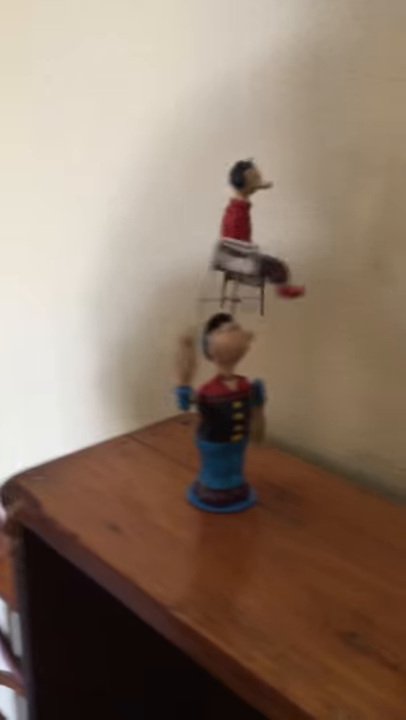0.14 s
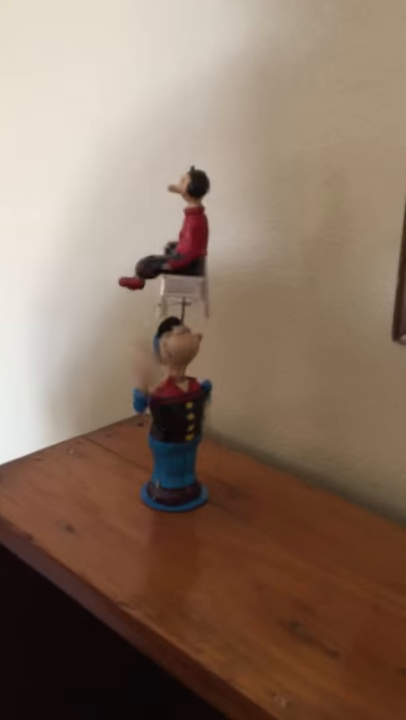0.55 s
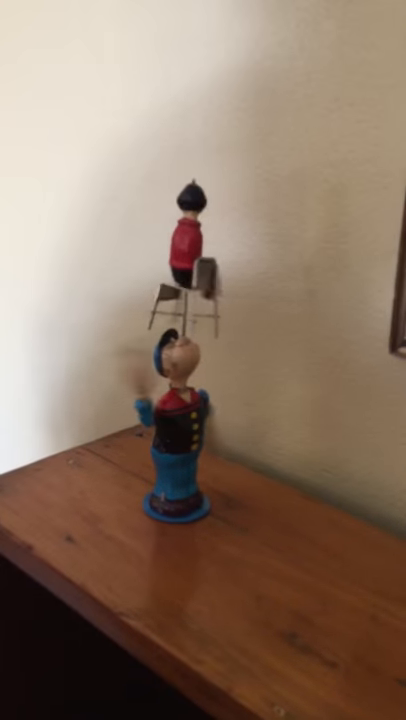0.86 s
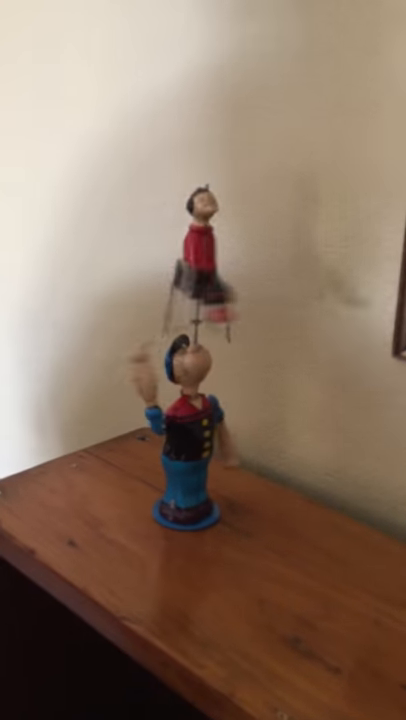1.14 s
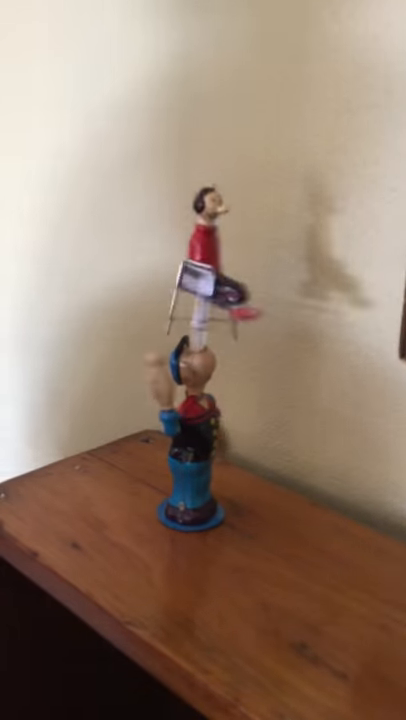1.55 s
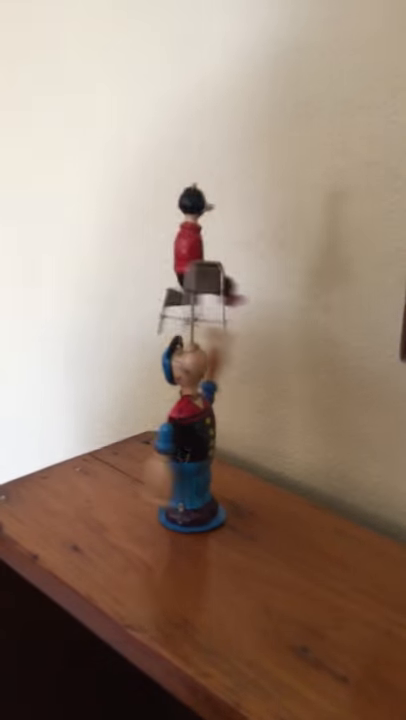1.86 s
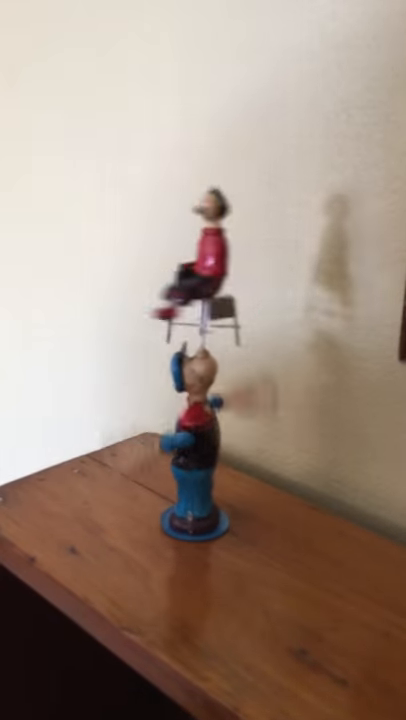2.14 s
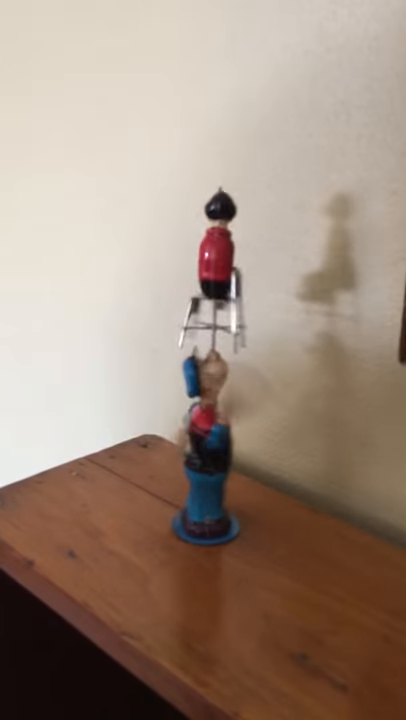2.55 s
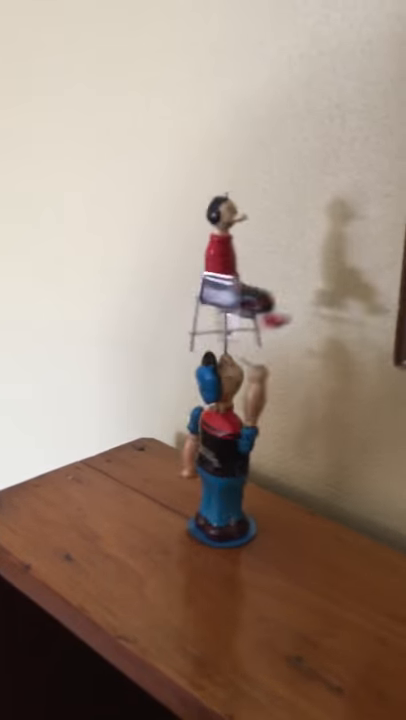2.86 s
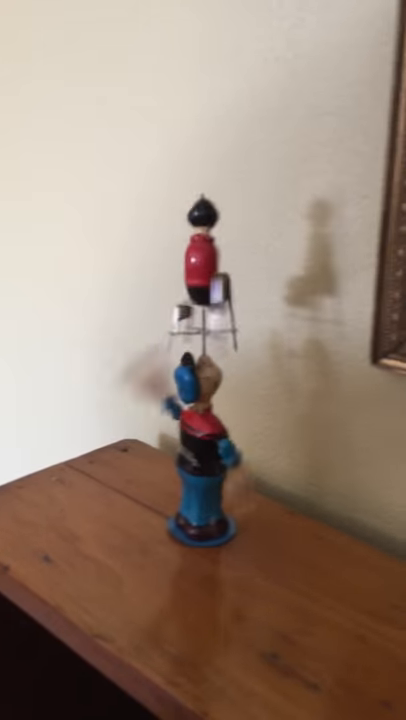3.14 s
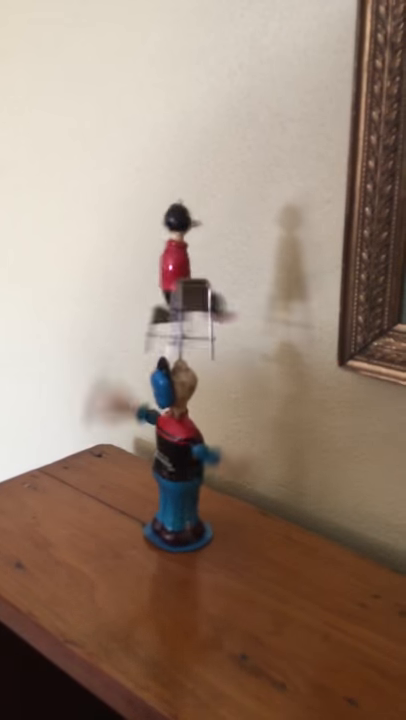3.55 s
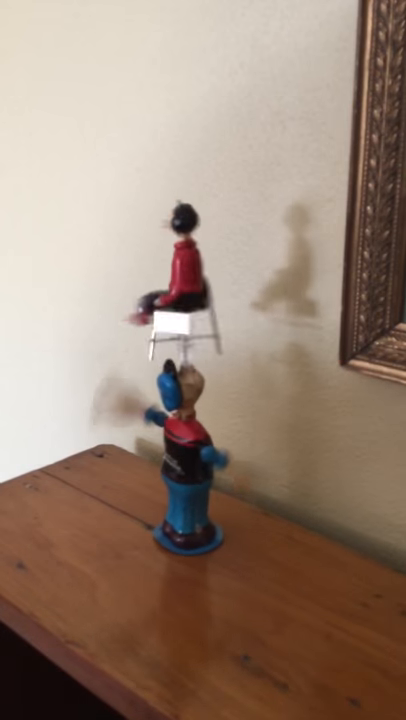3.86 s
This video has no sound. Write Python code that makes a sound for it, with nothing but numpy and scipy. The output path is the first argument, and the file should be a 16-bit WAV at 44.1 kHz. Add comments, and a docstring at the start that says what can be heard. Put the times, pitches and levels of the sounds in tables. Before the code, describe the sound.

A tin wind-up toy clacks and rattles as it runs on a wooden cabinet top indoors.

```python
"""On a wooden cabinet top in a small room, a tin wind-up toy runs close to the microphone.
Arms and chair clack about twice a second, loose joints tick and pivots scrape: noise bursts through tin
resonances. Decaying sines ring the hollow body; filtered knocks and noise rumble in the wood.
Low tones boom briefly, one dull thump falls near the middle, and faint air noise lies beneath.
Early echoes and a room tail shift as the toy turns."""
import sys
import numpy as np
from scipy import signal
from scipy.fft import rfft, irfft
from scipy.io import wavfile
from scipy.ndimage import uniform_filter1d

SR = 44100
rng = np.random.default_rng(int(sys.argv[2]) if len(sys.argv) > 2 else 0)


def transcribe(signal):
    """Save signal, clipped to [-1, 1], as a 16-bit WAV file at the path in sys.argv[1]."""
    frames = np.atleast_2d(signal).T
    limited = np.clip(frames, -1, 1)
    pcm = np.round(limited * 32767).astype(np.int16)
    wavfile.write(sys.argv[1], SR, pcm)


N = 176400
T = np.arange(N) / SR

# All dB in the tables are relative; filters and the mix scale them further.
# Clacks. Each row: start in seconds, crack in dB, chatter in dB, chatter decay in seconds, shelf on the
# middle and low tones in dB, struck-part ring in Hz, ring in dB, push on the wood in dB.
CLACK_EVENTS = [(0.206, -16, -27.5, 0.0082, -11.5, 3150, 4, -42),
                (0.665, -25, -28.5, 0.0055, -1.5, 3470, 8.5, -43.5),
                (1.1848, -18, -27, 0.015, 2.5, 3300, -7, -39),
                (1.5832, -20.5, -28, .011, -0.5, 3450, 0.5, -42),
                (2.5537, -37, -34, 0.003, 3, 4440, -1, -55),
                (2.6514, -20.5, -36, 0.0052, 1, 2080, -1, -45.5),
                (2.9180, -12.5, -29, 0.016, -1.5, 2480, -7, -37),
                (3.3645, -16.5, -27.5, .013, -2.5, 2880, -6, -37.5)]
# Taps of loose joints. Each row: start in seconds, level in dB, shelf on the middle and low tones in dB.
TICK_EVENTS = [(0.082, -57, -4), (.149, -54, 6), (0.2242, -29.5, -2), (0.2993, -46, -13),
               (0.4437, -49, -10), (.578, -57.5, 0), (.595, -57, -7), (.853, -64.5, -14), (1.0256, -55, 6),
               (1.0397, -42.5, 2), (1.0598, -40, -13), (1.1215, -45.5, 3.5), (1.332, -51, -1),
               (1.3466, -51, 9.5), (1.3817, -54, 11), (1.4536, -67, 9), (1.7131, -47, -12),
               (1.727, -52.5, 7), (2.0669, -44.5, -1), (2.094, -46, -7), (2.1005, -45.5, 9.5),
               (2.27, -50, 11), (2.2798, -40, 6), (2.287, -46.5, 13), (2.3132, -40, -7), (2.3415, -43, -5),
               (2.392, -50, 0), (2.4141, -42, 5.5), (2.386, -53.5, 5), (2.501, -46.5, 11),
               (2.545, -43.5, -9), (2.6238, -40.5, 0), (2.7257, -45, 6.5), (2.7595, -48.5, -15),
               (2.7858, -50.5, 4), (2.8022, -47, 5), (2.822, -51.5, 9), (3.2875, -45.5, 0.5),
               (3.394, -36.5, 3.5), (3.468, -47, 3), (3.479, -55, 4), (3.489, -57, -4), (3.5318, -46, -10),
               (3.546, -40, -1), (3.6226, -50.5, -8), (3.6465, -47, 0), (3.660, -49.5, 4), (3.761, -44, -6),
               (3.7683, -38, -14), (3.777, -39.5, -1), (3.786, -40, -4), (3.8153, -46, 6),
               (3.831, -54.5, 9), (3.889, -61.5, 6), (3.909, -60.5, 9), (3.9597, -54, -20)]
# Tin rubbing on tin. Each row: start in seconds, length in seconds, level in dB, squeak in Hz.
SCRAPE_EVENTS = [(0.076, 0.044, -61.5, 1800), (0.138, 0.087, -60.5, 1900), (0.514, 0.018, -72.5, 1760),
                 (0.572, 0.045, -62.5, 1800), (0.634, 0.059, -59.5, 2200), (0.909, .045, -63.5, 1780),
                 (0.955, 0.15, -70.5, 1770), (1.023, 0.055, -55.5, 1790), (1.15, 0.064, -51.5, 1740),
                 (1.429, .05, -62.5, 1120), (1.566, .03, -52.5, 1990), (1.848, 0.026, -67, 1820),
                 (2.273, 0.064, -53.5, 1530), (2.382, 0.035, -52.5, 1820), (2.493, .06, -59, 1550),
                 (2.62, 0.085, -54, 2140), (2.729, 0.14, -64, 2580), (2.883, .06, -54.5, 2040),
                 (3.344, 0.027, -53.5, 2700), (3.434, 0.057, -60, 1790), (3.56, 0.11, -68, 1480),
                 (3.702, 0.13, -60.5, 2530), (3.876, 0.069, -71.5, 1760)]
# Low notes of the wooden top. Each row: start in seconds, length in seconds, level in dB, pitch in Hz.
BOOM_EVENTS = [(1.195, 0.052, -38, 161.2), (1.232, .075, -35, 151.3), (1.865, 0.033, -43, 190),
               (2.39, 0.033, -37, 171), (2.975, 0.048, -42, 154), (3.41, 0.065, -42, 152.7)]
# Partials of the dull thump. Each row: frequency in Hz, level in dB, T60 in seconds.
THUMP_PARTIALS = [(132, -32, 0.14), (205.4, -40.5, 0.15), (251.7, -35.5, 0.22), (385, -59, 0.12),
                  (518, -58, 0.093)]
# Rumble level in the wood. Each row: time in seconds, level in dB.
RUMBLE_LEVEL = [(.08, -54.5), (.33, -54), (.45, -59), (.6, -53), (.8, -55.5), (.92, -66.5), (1.04, -47.5),
                (1.15, -54), (1.38, -53.5), (1.52, -61), (1.66, -51), (1.95, -62.5), (2.1, -53),
                (2.19, -62.5), (2.32, -53.5), (2.8, -51), (3.02, -51.5), (3.12, -65), (3.3, -56.5),
                (3.48, -46.5), (3.7, -59), (3.79, -45), (3.88, -53.5), (4, -55.5)]
# Modes of the hollow tin body. Each row: frequency in Hz, level in dB, T60 in seconds.
HOLLOW_MODES = [(333, -9, .3), (430, -2.5, 0.17), (496, -15.5, 0.21), (647, -11, 0.28), (794, -12, 0.32),
                (933, -12, 0.34), (1086, -11, 0.17)]
# Broad colours of tin, rubbing, wood and air. Each row: frequency in Hz, gain in dB.
TIN_COLOUR = [(100, -42), (350, -7.5), (550, -5.5), (900, -1.5), (1500, 3), (2800, 3), (4500, 2), (7000, 2),
              (10000, 0), (12500, 2), (15000, -3)]
RUB_COLOUR = [(200, -23), (700, 2.5), (1300, -3.5), (1850, 5.5), (2600, -5), (4000, -8), (8000, -13.5),
              (15000, -19.5)]
WOOD_COLOUR = [(25, -35), (55, -11.5), (100, -28), (150, -4), (200, -2), (270, -14), (340, -10.5),
               (420, -28), (600, -30.5), (1000, -31.5), (3000, -52), (12000, -74.5)]
AIR_COLOUR = [(25, -18.5), (55, 2), (78, 5.5), (110, 9.5), (400, -11.5), (1000, -12.5), (3000, -19),
              (8000, -25), (15000, -30.5)]
# Resonances of tin and wood. Each row: frequency in Hz, width in Hz, lift in dB.
TIN_RESONANCES = [(428, 21.4, 12), (642, 27, 7), (1092, 31, 7), (1470, 23, 4.8), (1759, 25, 8.8),
                  (2593, 63, 7.4), (2870, 30, 3), (3380, 26, 4), (4580, 180, 3.2), (5750, 22, 2.7),
                  (6940, 140, 3.9), (8300, 280, 4.2), (9680, 89, 8), (11170, 145, 6.4)]
WOOD_RESONANCES = [(79, 6.6, 12), (151.6, 12.7, 9.6), (205, 15, 4.3), (329.3, 16.2, 7.1), (457, 29, 7)]
# Decay of the room tail. Each row: frequency in Hz, T60 in seconds.
ROOM_T60 = [(150, .5), (800, .38), (2500, 0.34), (6000, 0.24), (14000, 0.2)]

CONTACTS_PER_S, GRAIN_SHARE = 2500, 0.52
CRACK_DECAY_S, CRACK_LOW_HZ, RING_WIDTH_HZ = 0.0011, 1500, 380
TICK_DECAY_S, MIDDLE_HZ = 0.0041, 2910
PART_LOW_HZ, PART_HIGH_HZ, PART_WIDTH_HZ, PART_DB = 1134, 5970, 107, 1.5
SQUEAK_WIDTH_HZ, SQUEAK_DB = 170, -4.5
PUSH_RISE_S, PUSH_DECAY_S, PUSH_GAIN = 0.008, 0.034, 2
KNOCKS_PER_S, KNOCK_SHARE = 49, 0.54
WOOD_LOW_HZ, WOOD_HIGH_HZ = 92, 1200
BOOM_EDGE_S, BOOM_OVERTONE_RATIO, BOOM_OVERTONE_DB = 0.03, 2.17, -16.5
THUMP_S, THUMP_RISE_S, THUMP_HOLD_S = 2.014, 0.0096, 0.011
ROOM_DB, EARLY_DB, EARLY_DECAY_S, TURN_S = -10.5, -1, 0.0084, 1.58
AIR_DB = -67
START_S, OPENING_S, EDGE_HZ = 0.081, 0.004, 15330


def amp(db):
    """Decibels to gain."""
    return 10 ** (np.asarray(db) / 20)


def unit(x):
    """Scale to rms 1."""
    return x / np.sqrt(np.mean(x ** 2) + 1e-20)


def read(points, hz):
    """Interpolate a table on a log-frequency axis."""
    f, value = np.transpose(points)
    return np.interp(np.log(hz + 1), np.log(f), value)


def add(mix, start_s, sound):
    """Mix a sound in, in place, cut at the end."""
    part = mix[max(round(start_s * SR), 0):][:len(sound)]
    part += sound[:len(part)]


def body(x, colour, modes=(), size=16384):
    """Minimum-phase filter of unit energy: a broad colour with ringing resonances."""
    hz = np.fft.rfftfreq(size, 1 / SR)
    power = np.ones(len(hz))
    for mode_hz, width_hz, lift_db in modes:
        power += (amp(lift_db) ** 2 - 1) / (1 + (2 * (hz - mode_hz) / width_hz) ** 2)
    gain = amp(read(colour, hz)) * np.sqrt(power)
    # Folding the cepstrum forward makes the filter causal.
    cepstrum = irfft(np.log(gain + 1e-5))
    cepstrum[1:size // 2] *= 2
    cepstrum[size // 2 + 1:] = 0
    response = irfft(np.exp(rfft(cepstrum)))[:size // 2]
    return signal.oaconvolve(x, response / np.linalg.norm(response))[:N]


def lows(x, hz):
    """First-order low-pass."""
    return signal.lfilter(*signal.butter(1, hz, fs=SR), x)


def shelve_middle(x, db):
    """Shelf on the tones below MIDDLE_HZ."""
    return x + (amp(db) - 1) * lows(x, MIDDLE_HZ)


def ring(x, hz, width_hz):
    """One resonance of peak gain 1."""
    return signal.lfilter(*signal.iirpeak(hz, hz / width_hz, SR), x)


def contacts(count):
    """Tin chattering on tin: tiny random impacts in a fine fizz, of even strength."""
    fizz = rng.standard_normal(count)
    hits = rng.choice([-1., 1.], count) * (rng.random(count) < CONTACTS_PER_S / SR)
    x = GRAIN_SHARE * unit(hits) + (1 - GRAIN_SHARE) * fizz
    return x / np.sqrt(uniform_filter1d(x ** 2, size=90) + 1e-9)


def clacks(rise_s=0.00021, uneven_db=3):
    """A bright crack, then uneven chatter as the parts settle; each struck part has its own ring."""
    out, t = np.zeros(N), T[:SR // 6]
    for start_s, crack_db, chatter_db, decay_s, middle_db, ring_hz, ring_db, _ in CLACK_EVENTS:
        crack = contacts(len(t)) * amp(crack_db) * np.exp(-t / CRACK_DECAY_S)
        bright_crack = crack - lows(crack, CRACK_LOW_HZ)
        wander = unit(uniform_filter1d(rng.standard_normal(len(t)), size=70))
        bounces = unit(amp(uneven_db * wander))
        chatter = bounces * contacts(len(t)) * amp(chatter_db) * np.exp(-t / decay_s)
        hit = (bright_crack + chatter) * (1 - np.exp(-t / rise_s))
        part_ring = amp(ring_db) * ring(hit, ring_hz, RING_WIDTH_HZ)
        add(out, start_s, shelve_middle(hit, middle_db) + part_ring)
    return out


def ticks(rise_s=0.00068, ring_count=3):
    """Loose joints tap and chatter briefly; every small part has a few random rings of its own."""
    out, t = np.zeros(N), T[:SR // 20]
    for start_s, db, middle_db in TICK_EVENTS:
        tap = contacts(len(t)) * amp(db) * np.exp(-t / TICK_DECAY_S) * (1 - np.exp(-t / rise_s))
        rings_hz = PART_LOW_HZ * (PART_HIGH_HZ / PART_LOW_HZ) ** rng.random(ring_count)
        rings = sum(ring(tap, hz, PART_WIDTH_HZ) for hz in rings_hz)
        add(out, start_s, shelve_middle(tap, middle_db) + amp(PART_DB) * rings)
    return out


def scrapes(rough_db=4):
    """Pivots rub in short, uneven strokes, each with a faint squeak."""
    out, t = np.zeros(N), T[:SR // 6]
    for start_s, length_s, db, squeak_hz in SCRAPE_EVENTS:
        stroke = np.sqrt(abs(np.sin(np.pi * np.clip(t / length_s, 0, 1))))
        grip = unit(uniform_filter1d(rng.standard_normal(len(t)), size=300))
        slips = unit(amp(rough_db * grip) * contacts(len(t)))
        squeak = amp(SQUEAK_DB) * unit(ring(slips, squeak_hz, SQUEAK_WIDTH_HZ))
        rub = unit(body(slips, RUB_COLOUR, TIN_RESONANCES)[:len(t)])
        add(out, start_s, amp(db) * stroke * (rub + squeak))
    return out


def hollow_body(rise_s=0.0044, spread_db=2):
    """Each clack sets the low modes of the hollow tin body ringing as decaying sines."""
    out, t = np.zeros(N), T[:SR // 3]
    for start_s, *_, push_db in CLACK_EVENTS:
        for hz, db, t60_s in HOLLOW_MODES:
            level = amp(push_db + db + spread_db * rng.standard_normal() - 60 * t / t60_s)
            tone = np.sin(2 * np.pi * (hz * t + rng.random()))
            add(out, start_s, level * (1 - np.exp(-t / rise_s)) * tone)
    return out


def wooden_top():
    """Clockwork shakes the wood with small knocks all the time, and each clack pushes it harder."""
    level = amp(np.interp(T, *np.transpose(RUMBLE_LEVEL)))
    for start_s, *_, push_db in CLACK_EVENTS:
        t = np.maximum(T - start_s, 0)
        swell = (1 - np.exp(-t / PUSH_RISE_S)) ** 2 * np.exp(-t / PUSH_DECAY_S)
        level = np.hypot(level, PUSH_GAIN * amp(push_db) * swell)
    knocks = unit(rng.choice([-1., 1.], N) * (rng.random(N) < KNOCKS_PER_S / SR))
    drive = KNOCK_SHARE * knocks + (1 - KNOCK_SHARE) * rng.standard_normal(N)
    shake = body(drive, WOOD_COLOUR, WOOD_RESONANCES)
    # Even out the local rms, so that the level curve rules.
    shake = level * shake / np.sqrt(uniform_filter1d(shake ** 2, size=3000) + 1e-9)
    band = signal.butter(2, [WOOD_LOW_HZ, WOOD_HIGH_HZ], "band", fs=SR, output="sos")
    return signal.sosfilt(band, shake)


def booms():
    """The rocking base holds the wood in a low note for a moment: a sine and one overtone."""
    out = np.zeros(N)
    for start_s, length_s, db, hz in BOOM_EVENTS:
        t = np.arange(0, length_s, 1 / SR)
        to_edge_s = np.minimum(t, length_s - t)
        swell = np.sin(np.pi / 2 * np.clip(to_edge_s / BOOM_EDGE_S, 0, 1))
        phase = 2 * np.pi * hz * t
        note = np.sin(phase) + amp(BOOM_OVERTONE_DB) * np.sin(BOOM_OVERTONE_RATIO * phase)
        add(out, start_s, amp(db) * swell * note)
    return out


def thump():
    """A soft, dull knock with no tin in it: low sines swell, hold briefly and die."""
    t = np.maximum(T - THUMP_S, 0)
    swell = np.sin(np.pi / 2 * np.minimum(t / THUMP_RISE_S, 1)) ** 2
    late_s = np.maximum(t - THUMP_HOLD_S, 0)
    tones = sum(amp(db - 60 * late_s / t60_s) * np.sin(2 * np.pi * hz * t)
                for hz, db, t60_s in THUMP_PARTIALS)
    return signal.lfilter(*signal.butter(2, WOOD_LOW_HZ, "high", fs=SR), swell * tones)


def room(x, facings=4):
    """Quick echoes from cabinet top and wall, then the room's tail; both shift as the toy turns."""
    t, out = T[:SR // 2], x
    for k in range(facings):
        hz, when_s, z = signal.stft(rng.standard_normal(len(t)), SR, nperseg=256)
        decay = amp(-60 * when_s / read(ROOM_T60, hz)[:, None])
        tail = signal.istft(z * decay, SR, nperseg=256)[1][:len(t)]
        tail = tail * np.minimum(t / 0.011, 1)
        early = contacts(len(t)) * np.exp(-t / EARLY_DECAY_S) * (t > 0.001)
        response = amp(ROOM_DB) * tail / np.linalg.norm(tail)
        response = response + amp(EARLY_DB) * early / np.linalg.norm(early)
        facing = np.maximum(np.cos(2 * np.pi * (T / TURN_S - k / facings)), 0)
        out = out + signal.oaconvolve(x * facing, response)[:N]
    return out


def still_air():
    """Steady noise with a low, soft colour."""
    return amp(AIR_DB) * body(rng.standard_normal(N), AIR_COLOUR)


def scene(tin_db=-3, scrape_db=-4, wood_db=-2, hollow_db=-4):
    """The toy in the room, the wood beneath it and still air."""
    struck_tin = body(clacks() + ticks(), TIN_COLOUR, TIN_RESONANCES)
    tin = amp(tin_db) * struck_tin + amp(scrape_db) * scrapes()
    toy = room(tin) + amp(hollow_db) * hollow_body()
    wood = amp(wood_db) * wooden_top() + booms()
    return (toy + wood + thump() + still_air())[None]


def record(dry):
    """Near silence until START_S, a quick linear opening, then a steep low-pass at EDGE_HZ."""
    opened = dry * np.clip((T - START_S) / OPENING_S, 0.003, 1)
    low_pass = signal.firwin(255, EDGE_HZ, window=("kaiser", 8), fs=SR)
    return signal.oaconvolve(opened, low_pass[None], "same")


dry = scene()
out = record(dry)
transcribe(out)
```